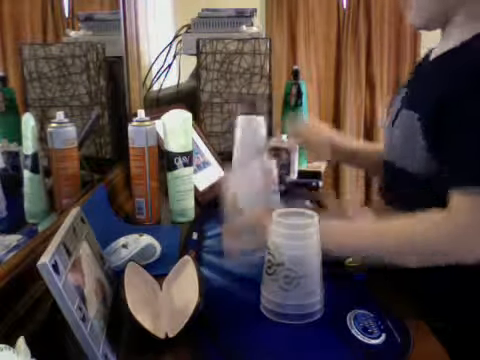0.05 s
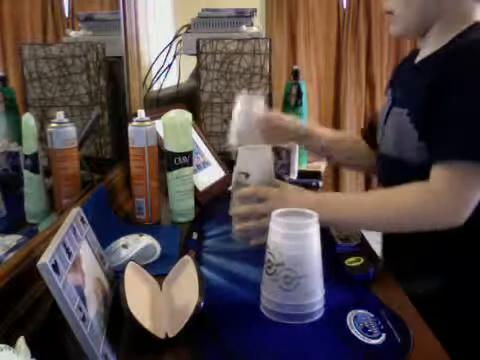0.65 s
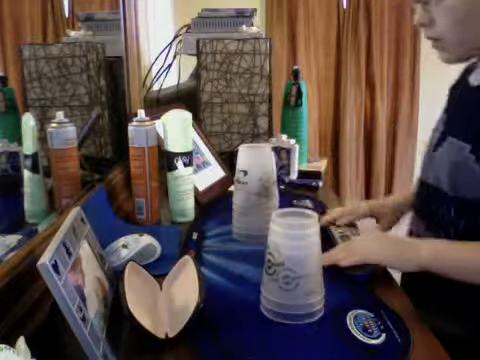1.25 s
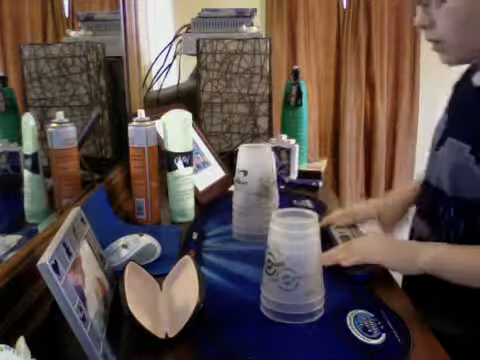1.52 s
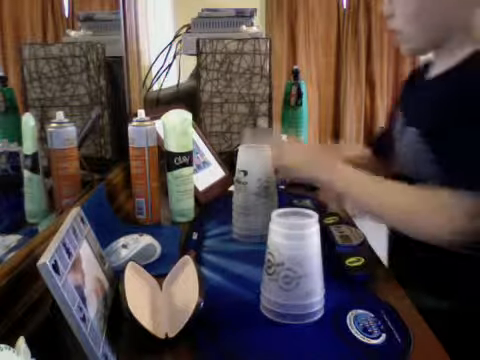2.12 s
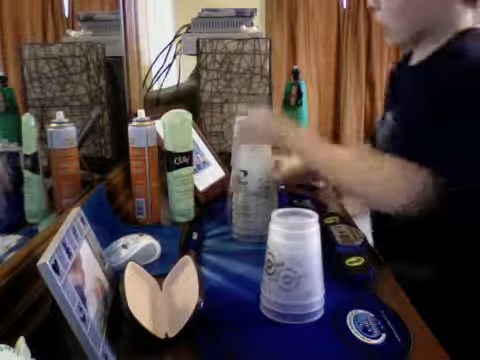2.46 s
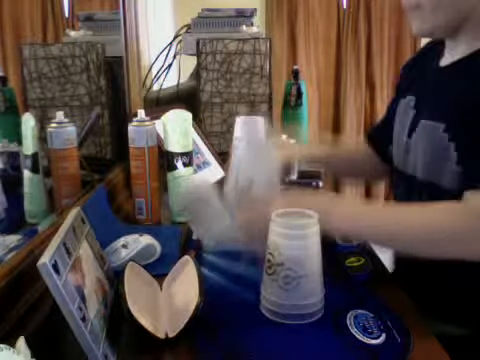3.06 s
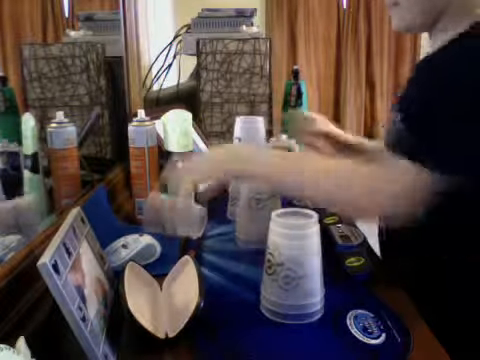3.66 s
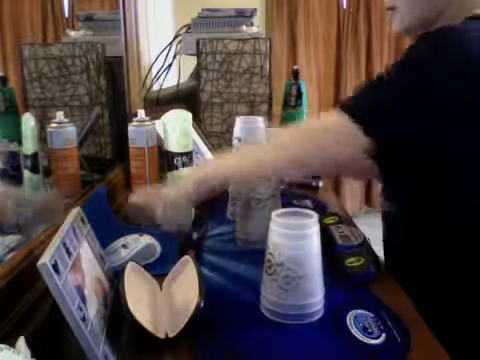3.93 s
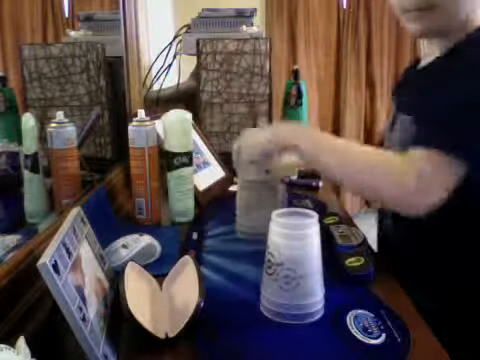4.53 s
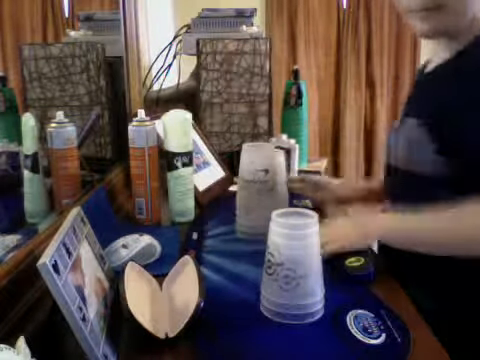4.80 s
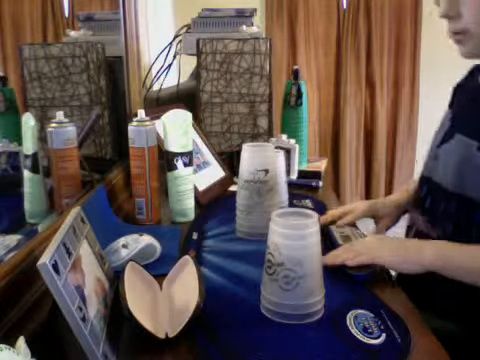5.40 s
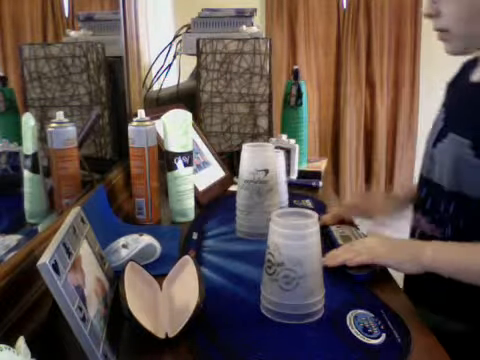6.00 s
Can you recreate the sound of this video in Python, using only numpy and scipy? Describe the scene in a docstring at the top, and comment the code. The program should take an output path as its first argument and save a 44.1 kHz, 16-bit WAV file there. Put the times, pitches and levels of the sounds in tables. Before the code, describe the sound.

In a small, quiet room, a quick burst of plastic cups knocking and nesting stops with a soft hand tap. After a short gap the cups clatter again for longer, popping, scraping and rattling, with stacks thumping onto a padded desk. Gentle pats on a pad follow, then a lull and a few more light taps. The microphone is close, has little treble and slightly overloads on the hardest knocks.

```python
"""Speed-stacking plastic cups

Cups are stacked on a padded desk in a small room, in two quick bursts. Each knock excites the air
cavity of a cup (a pop), its shell (a crack) and the desk (a thud). Nesting cups scrape by stick-slip
friction, and hands land on a timer pad in between. A small, close microphone with little treble
overloads on the hard knocks."""
import sys
import numpy as np
from scipy import signal
from scipy.fft import rfft, irfft
from scipy.io import wavfile
from scipy.ndimage import uniform_filter1d

SR = 44100
rng = np.random.default_rng(int(sys.argv[2]) if len(sys.argv) > 2 else 0)


def put_to_file(sound):
    """Save the sound as 16-bit audio at rate SR, in the file named by the first command-line argument."""
    columns = np.atleast_2d(sound).T  # one column per channel
    safe = np.clip(columns, -1, 1)
    whole_steps = np.round(safe * 32767)
    wavfile.write(sys.argv[1], SR, whole_steps.astype(np.int16))


N = 276507
TIME = np.arange(N) / SR
RING_TIME = TIME[:SR * 2 // 5]  # time axis of one impact, 0.4 s
ATTACK_SAMPLES = 530  # the first 12 ms set the level of a pop or crack
BRUSH_S = 0.027  # the cups first touch this long before a knock
MIC_TOP_HZ = 5350

# spectrum of plastic striking plastic: frequency_hz, gain_db
CRACK_SPECTRUM = [(100, -7.5), (400, -14), (750, 7), (1050, -3), (1500, 1.5), (2000, -0.5), (2600, -4),
                  (3300, -3), (4200, -11.5), (5400, -18)]
# spectrum of plastic sliding on plastic: frequency_hz, gain_db
SCRAPE_SPECTRUM = [(80, -22.5), (250, 8), (750, 1.5), (1100, 2.5), (1850, 0.5), (2450, 0), (3200, 5),
                   (3800, -0.5), (4400, 3), (5400, -7)]


def undb(db):
    """Amplitude ratio of a level in decibels."""
    return 10 ** (np.asarray(db) / 20)


def decay(t60, t=RING_TIME):
    """Exponential damping: 60 dB lost in t60 seconds."""
    return np.exp(-np.log(1000) * t / t60)


def unit_rms(x, size=None):
    """Scale to rms 1 over the first size samples (all by default)."""
    return x / np.sqrt(np.mean(x[:size] ** 2) + 1e-18)


def add(out, start_s, x):
    """Superposition: x joins the mix at start_s."""
    i = int(np.clip(start_s * SR, 0, N - 1))
    out[i:i + len(x)] += x[:N - i]


def colour(x, spectrum, size=2048):
    """Minimum-phase filtering through (Hz, dB) points, keeping the power of white noise."""
    hz, db = np.transpose(spectrum)
    bins_hz = np.arange(size // 2 + 1) * SR / size
    log_gain = np.log(undb(np.interp(np.log(bins_hz + 1), np.log(hz), db)))
    log_gain -= 2 * (bins_hz > 2 * MIC_TOP_HZ)  # 17 dB less far above the microphone's band
    cepstrum = irfft(log_gain)[:size // 2]
    cepstrum[1:] *= 2
    response = irfft(np.exp(rfft(cepstrum, size)))
    return signal.fftconvolve(x, unit_rms(response) / np.sqrt(size))[:len(x)]


def ring(modes, scatter_db, detune):
    """Free vibration in damped modes; the point of impact varies their strength and, slightly, pitch."""
    out = np.zeros(len(RING_TIME))
    for k, (hz, db, t60) in enumerate(modes):
        strength, shift = rng.standard_normal(2)
        t = RING_TIME[:int(t60 * SR)]
        wave = decay(t60, t) * np.sin(2 * np.pi * hz * (1 + detune * shift) * t)
        out[:len(t)] += (-1) ** k * undb(db + scatter_db * strength) * wave
    return out


def soften(x, contact_s):
    """A force pulse acts as a low-pass filter: the longer the contact, the duller the blow."""
    force = np.hanning(max(int(contact_s * SR), 1) + 2)
    return signal.fftconvolve(x, force / force.sum())[:len(x)]


def contact_time(db, longest_s=.00036, hard_db=-29, range_db=22.5):
    """Elastic contact lasts longer for a light touch than for a hard blow."""
    return longest_s * np.clip((hard_db - db) / range_db, 0, 1)


def ticks(size, per_s, spread_db):
    """Shot noise: tiny random contacts of uneven strength."""
    hits = rng.random(size) < per_s / SR
    strength, side = rng.standard_normal((2, size))
    return unit_rms(hits * undb(spread_db * np.clip(strength, -2, 2)) * np.sign(side))


def background(air_db=-64, hum_hz=111):
    """The noise floor: broadband room air and a faint electrical hum that rises near the end."""
    # spectrum of still room air: frequency_hz, gain_db
    air_spectrum = [(30, -38), (105, -9.5), (145, -14.5), (400, -15), (500, -10), (750, -18), (1400, -22),
                    (3200, -27.5), (5200, -39), (7000, -71)]
    # envelope of the hum: time_s, level_db
    hum_levels = [(0, -83.5), (5.3, -79.5), (5.8, -71), (6.27, -62)]
    air = undb(air_db) * unit_rms(colour(rng.standard_normal(N), air_spectrum))
    hum_rms = undb(np.interp(TIME, *np.transpose(hum_levels)))
    return air + hum_rms * np.sqrt(2) * np.sin(2 * np.pi * hum_hz * TIME)


def slides(edge_s=0.0027, swell_db=1.5, jerk_db=2.5, gain_db=-2.0):
    """Stick-slip friction: dense ticks swell as the walls close in, under uneven hand pressure."""
    # cups sliding in and out of each other: start_s, end_s, relative_end_level_db
    strokes = [(0.047, 0.078, -45), (0.194, 0.268, -33.5), (0.265, 0.349, -24), (.54, 0.617, -28),
               (.846, 0.929, -50), (2.276, 2.315, -29.5), (2.488, 2.784, -43.5), (2.792, 2.897, -28.5),
               (2.931, 3.072, -30.5), (3.27, 3.348, -35.5), (3.342, 3.349, -22), (3.832, 3.952, -49),
               (3.952, 4.073, -31), (4.18, 4.226, -28.5), (4.218, 4.339, -40.5), (4.345, 4.472, -32),
               (4.646, 4.785, -48), (6.227, 6.283, -48)]
    pressure = np.zeros(N)
    for start, end, db in strokes:
        gate = np.clip(np.minimum(TIME - start, end - TIME) / edge_s + .5, 0, 1)
        pressure += gate * undb(db - np.interp(TIME, [start, end], [swell_db, 0]))
    jerks = uniform_filter1d(rng.standard_normal(N), size=200)
    jerks = unit_rms(uniform_filter1d(jerks, size=200))
    rubbing = undb(jerk_db * jerks) * ticks(N, per_s=1500, spread_db=5)
    return colour(rubbing * pressure * undb(gain_db), SCRAPE_SPECTRUM)


def approach():
    """An envelope that grows exponentially as two cups close in and dies after they meet."""
    t = RING_TIME[:int(3 * BRUSH_S * SR)]
    return np.exp(-4 * np.abs(t / BRUSH_S - 1))


def air_rush(hz, db=-14, q=1.0):
    """Flow noise: air squeezed between the cups is filtered by the resonance of their hollow."""
    hollow = signal.iirpeak(hz, q, fs=SR)
    envelope = approach()
    flow = rng.standard_normal(len(envelope))
    air = signal.lfilter(*hollow, signal.lfilter(*hollow, flow))
    return undb(db) * unit_rms(air) * envelope


def rim_brush(db=-13):
    """Friction noise: the rims graze each other around the blow."""
    envelope = approach()
    return undb(db) * colour(rng.standard_normal(len(envelope)), SCRAPE_SPECTRUM) * envelope


def air_pop(hz, t60=0.025, swell_s=0.0037, overtone=1.97, overtone_db=-12, bend=0.05, bend_s=0.0028):
    """Cavity resonance: a cup's air swells and dies quickly, wavering as the gap at the rim changes."""
    waver = .045 * unit_rms(uniform_filter1d(rng.standard_normal(len(RING_TIME)), size=200))
    pitch_hz = hz * (1 + bend * np.exp(-RING_TIME / bend_s) + waver)
    phase = 2 * np.pi * np.cumsum(pitch_hz) / SR
    tone = np.sin(phase) + undb(overtone_db) * np.sin(overtone * phase)
    swell = (1 - np.exp(-(RING_TIME / swell_s) ** 2)) ** 2
    return unit_rms(swell * decay(t60) * tone, ATTACK_SAMPLES)


def shell_crack(hz, give_s=0.0016, snap_t60=0.029, wall_db=-7, wall_t60=0.086, peak_db=7, peak_q=7.3):
    """Shell vibration: the rim gives and snaps, both cups ring; the point of impact sets the peak at hz."""
    # modes of a cup wall: pitch_hz, level_db
    wall_modes = [(883, 4), (1180, -1.5), (1400, -2.5), (1650, -14), (1965, -2), (2380, -15.5),
                  (3020, -3.5), (3400, -5.5), (3720, -9.5), (4010, -10), (4500, -10.5)]
    give = 1 - np.exp(-(RING_TIME / give_s) ** 2)
    snap = colour(rng.standard_normal(len(RING_TIME)) * decay(snap_t60), CRACK_SPECTRUM)
    modes = [(mode_hz, db, wall_t60) for mode_hz, db in wall_modes]
    walls = sum(ring(modes, scatter_db=2, detune=.015) for _ in range(2))
    crack = give * (unit_rms(snap, ATTACK_SAMPLES) + undb(wall_db) * unit_rms(walls, ATTACK_SAMPLES))
    peak = signal.lfilter(*signal.iirpeak(hz, peak_q, fs=SR), crack)
    return crack + undb(peak_db) * peak


def desk_thud(contact_s, scatter_db=1.5):
    """Plate vibration: a blow excites the desk, and a long push only its lowest modes."""
    # modes of the desk under its mat: pitch_hz, level_db, t60_s
    desk_modes = [(96.5, -14.5, 0.25), (127.2, -15, 0.41), (170.5, -8, .2), (238, 0.5, 0.07),
                  (289, 4, 0.067), (351, 2, .08), (443, 2, 0.067), (510, 1.5, 0.077)]
    desk = ring(desk_modes, scatter_db, detune=.025)
    return unit_rms(soften(desk, contact_s), size=1100)


def cup_impact(pop_hz, pop_db, crack_hz, crack_db, cushion_s=0.0005, air_lead_s=.001):
    """One impact excites three resonators, air, shell and desk; the blow falls BRUSH_S after the start."""
    # trapped air cushions the blow: a pop 8 to 22 dB above the crack dulls it more and more
    cushioning = np.clip((pop_db - crack_db - 8) / 14, 0, 1)
    contact_s = contact_time(crack_db) + cushion_s * cushioning
    crack = unit_rms(soften(shell_crack(crack_hz), contact_s), ATTACK_SAMPLES)
    thud = desk_thud(contact_s=0.0015, scatter_db=2)
    # a deeper pop means a taller, heavier stack: 4.5 dB more thud per octave
    thud_db = (pop_db + crack_db) / 2 - 2 - 4.5 * np.log2(pop_hz / 352)
    out = np.zeros(2 * len(RING_TIME))
    add(out, 0, undb(pop_db) * air_rush(pop_hz) + undb(crack_db) * rim_brush())
    add(out, BRUSH_S - air_lead_s, undb(pop_db) * air_pop(pop_hz))
    add(out, BRUSH_S, undb(crack_db) * crack + undb(thud_db) * thud)
    return out


def knocks(rebound_s=.029, rebound_spread=.15, rebound_pop_db=-16.5, rebound_crack_db=-21):
    """Inelastic collision: a cup strikes, rocks and touches again, weaker and retuned by its tilt."""
    # cup striking cup: time_s, pop_hz, pop_db, crack_hz, crack_db
    blows = [(0.1536, 610, -27.5, 1380, -50), (.197, 1200, -37.5, 3560, -35), (0.2371, 660, -20, 2020, -30),
             (0.2835, 390, -20.5, 3330, -19), (0.3248, 880, -15, 1530, -17), (0.3493, 344, -9, 1350, -12.5),
             (0.5568, 629, -6.5, 1980, -19), (.614, 298.7, -9.5, 1880, -12.5),
             (0.6417, 870, -19, 2730, -21.5), (1.072, 1160, -49, 1700, -56),
             (1.9916, 622.4, -41, 1617, -38.5), (2.0218, 523, -24.5, 1500, -25.5),
             (2.087, 531, -31, 1700, -35.5), (2.1887, 596, -43, 1400, -61), (2.2477, 327, -14, 1360, -33.5),
             (2.2889, 519, -14, 1750, -23), (2.2984, 605, -3, 2320, -20), (2.309, 1178, -10.5, 1330, -21.5),
             (2.6518, 1190, -33.5, 3120, -26.5), (2.686, 704, -36, 1450, -27.5),
             (2.8306, 802, -13, 3940, -18.5), (2.8481, 1144, -13, 1350, -25),
             (2.8974, 529, -7.5, 1500, -15.5), (2.9157, 515, -18, 1450, -10),
             (2.9631, 532, -3.5, 2900, -15), (2.9744, 506, -12.5, 2360, -25), (3.0269, 358, -23, 1470, -20),
             (3.1239, 505, -14.5, 1340, -15.5), (3.27, 485, -22.5, 1390, -38),
             (3.2871, 359, -23.5, 1640, -18), (3.3614, 600, -19, 2260, -11.5),
             (3.41, 411, -30.5, 1470, -28), (3.6751, 533, -66, 2364, -49), (3.8358, 634, -17.5, 1390, -36),
             (3.938, 1226, -31.5, 1340, -37.5), (3.9616, 655, -22, 2800, -27.5),
             (4.0387, 873, -13, 1680, -14.5), (4.2, 417, -12.5, 1360, -18), (4.3568, 565, -6, 1760, -19),
             (4.4096, 732, -26, 1430, -30), (4.4694, 279.6, -17, 4120, -14),
             (4.4908, 914, -22.5, 3800, -24.5)]
    out = np.zeros(N)
    for time_s, pop_hz, pop_db, crack_hz, crack_db in blows:
        late, tilt = rng.standard_normal(2)
        tilted_hz = pop_hz * 2 ** (.3 * tilt)
        rebound = cup_impact(tilted_hz, pop_db + rebound_pop_db, crack_hz, crack_db + rebound_crack_db)
        add(out, time_s - BRUSH_S, cup_impact(pop_hz, pop_db, crack_hz, crack_db))
        add(out, time_s - BRUSH_S + rebound_s * np.exp(rebound_spread * late), rebound)
    return out


def landings(rise_s=0.0027):
    """Impact and free vibration: dropped stacks thump the desk, ring and chatter as they settle."""
    # whole stacks landing: start_s, ring_db, rattle_db, rattle_t60_s, thump_db
    drops = [(.351, -32, -22, .21, -14), (.615, -18, -13.5, 0.23, -14.5), (2.299, -23.5, -15, 0.21, -36),
             (2.9, -37.5, -24.5, .12, -18), (4.039, -23.5, -20, .22, -29), (4.471, -13, -22, 0.21, -17.5)]
    # modes of a nested stack: pitch_hz, level_db, t60_s
    stack_modes = [(896, 2, 0.022), (1994, -1, 0.11), (3000, -18.5, .22), (4220, -16.5, 0.22),
                   (4050, -14, 0.25)]
    out = np.zeros(N)
    rise = 1 - np.exp(-RING_TIME / rise_s)
    for start_s, ring_db, rattle_db, rattle_t60, thump_db in drops:
        stack = undb(ring_db) * ring(stack_modes, scatter_db=1, detune=.002)
        chatter = colour(ticks(len(RING_TIME), per_s=1200, spread_db=3.5), CRACK_SPECTRUM)
        rattle = undb(rattle_db) * chatter * decay(rattle_t60)
        add(out, start_s, (stack + rattle) * rise)
        add(out, start_s, undb(thump_db) * desk_thud(contact_s=.003))
    return out


def sympathetic_tones():
    """Sympathetic vibration: something nearby rings faintly after two hard landings."""
    # tones of a nearby object: start_s, pitch_hz, level_db, t60_s
    tones = [(.615, 1463, -46, 1), (2.31, 1185, -25.5, .38)]
    out = np.zeros(N)
    for start_s, hz, db, t60 in tones:
        add(out, start_s, undb(db) * decay(t60, TIME) * np.sin(2 * np.pi * hz * TIME))
    return out


def pad_bumps(tap_hz=1620, hollow_hz=700, hollow_db=-3, sink_s=.003):
    """Cushioned impact: a hollow tap on plastic, then a soft, long push on the desk."""
    # hands and stacks coming down on the pad: start_s, thump_db, tap_db
    bumps = [(.903, -37, -33), (1.948, -34, -40), (2.494, -29.5, -48), (3.124, -23, -44.5),
             (3.27, -30, -54.5), (3.725, -41, -57.5), (4.667, -39, -35), (4.7335, -68, -46.5),
             (4.757, -39.5, -33.5), (6.193, -36.5, -42), (6.239, -54, -43), (6.2655, -39, -43)]
    out = np.zeros(N)
    for start_s, thump_db, tap_db in bumps:
        thump = desk_thud(contact_s=.006)
        tap = unit_rms(soften(shell_crack(tap_hz), contact_time(tap_db)), ATTACK_SAMPLES)
        hollow = undb(hollow_db) * air_pop(hollow_hz)
        add(out, start_s, undb(tap_db) * (tap + hollow))
        add(out, start_s + sink_s, undb(thump_db) * thump)
    return out


def jiggles(gap_s=.036, uneven=.1, pop_hz=713, spread_octaves=.22, spread_db=4, max_taps=10):
    """Rattling: loosely held cups collide lightly at a quick, uneven pace."""
    # cups shaking in the hand: start_s, end_s, level_db
    shakes = [(2.511, 2.79, -36), (3.99, 4.035, -26)]
    out = np.zeros(N)
    for start, end, db in shakes:
        for k, (late, pitch, strength) in enumerate(rng.standard_normal((max_taps, 3))):
            time_s = start + gap_s * (k + uneven * late)
            tap_hz = pop_hz * 2 ** (spread_octaves * pitch)
            tap_db = db + spread_db * strength
            tap = cup_impact(tap_hz, tap_db, crack_hz=1450, crack_db=tap_db - 3)
            if time_s < end:
                add(out, time_s - BRUSH_S, tap)
    return out


def room(x, tail_db=-10, build_s=0.0089, late_db=-27, late_t60=0.81):
    """Reverberation: early reflections, a short diffuse tail and a faint longer one from the house."""
    # the room's diffuse tail: frequency_hz, gain_db, t60_s
    tail_bands = [(80, 0, .5), (200, -8, 0.68), (567, 5.5, 0.18), (1500, 2, 0.23), (4000, 4.5, 0.2)]
    # first reflections from wall and furniture: delay_s, gain_db
    reflections = [(.0075, -20.5), (0.022, -29.5), (.028, -20)]
    hz, db, t60 = np.transpose(tail_bands)
    tail = np.zeros(len(RING_TIME))
    for centre in np.geomspace(62.5, 8000, 8):
        edges_hz = [centre / np.sqrt(2), centre * np.sqrt(2)]
        octave = signal.butter(3, edges_hz, "band", fs=SR, output="sos")
        band = signal.sosfilt(octave, rng.standard_normal(len(RING_TIME)))
        band_db, band_t60 = (np.interp(np.log(centre), np.log(hz), column) for column in (db, t60))
        tail += undb(band_db) * band * (decay(band_t60) + undb(late_db) * decay(late_t60))
    tail *= 1 - np.exp(-(RING_TIME / build_s) ** 2)
    response = undb(tail_db) * tail / np.sqrt(2 * np.sum(tail ** 2))
    for delay_s, echo_db in reflections:
        response[int(delay_s * SR)] += undb(echo_db)
    return x + signal.fftconvolve(x, response)[:N]


def scene():
    """Superposition of cups and hands in the room over the noise floor, in one channel."""
    direct = knocks() + jiggles() + landings() + sympathetic_tones() + slides() + pad_bumps()
    return (room(direct) + background())[None]


def record(dry, overload=0.77, low_cut_hz=70, mic_rate_hz=11025, image_db=-15, ceiling=.71):
    """Saturation and band limiting: the microphone rounds peaks, loses bass and treble, clips crests."""
    low_cut = signal.butter(4, low_cut_hz, "high", fs=SR, output="sos")
    high_cut = signal.ellip(10, .3, 70, MIC_TOP_HZ, fs=SR, output="sos")
    image_cut = signal.cheby1(10, 1, 6000, fs=SR, output="sos")
    output_cut = signal.ellip(8, .2, 70, 15800, fs=SR, output="sos")
    rounded = overload * np.tanh(dry / overload)
    band = signal.sosfilt(high_cut, signal.sosfilt(low_cut, rounded))
    # spectral imaging: the low sample rate mirrors the band's upper edge
    image = signal.sosfilt(image_cut, band * np.cos(2 * np.pi * mic_rate_hz * TIME))
    clipped = np.clip(band + undb(image_db) * image, -ceiling, ceiling)
    return signal.sosfilt(output_cut, clipped)


dry = scene()
out = record(dry)
put_to_file(out)
```